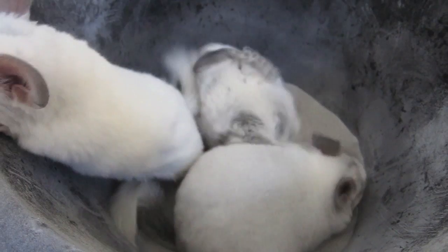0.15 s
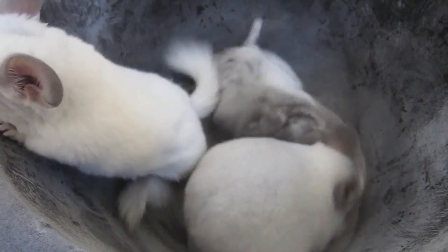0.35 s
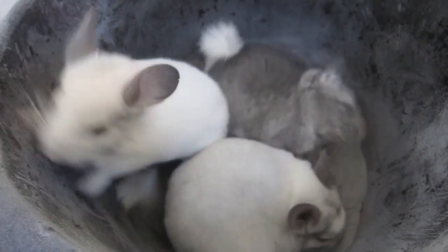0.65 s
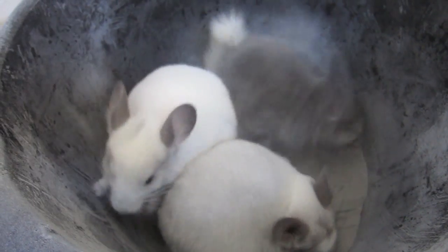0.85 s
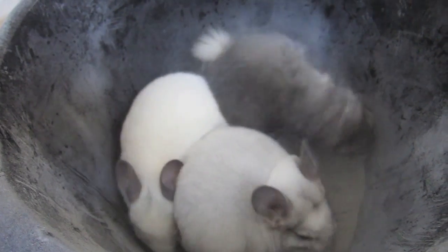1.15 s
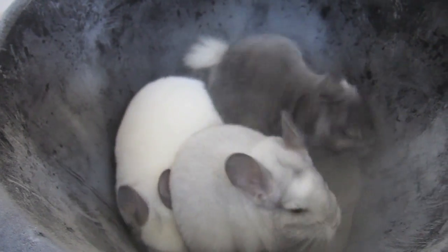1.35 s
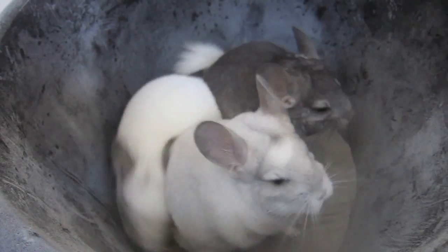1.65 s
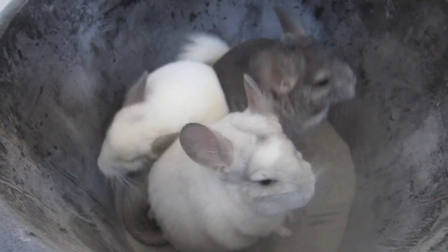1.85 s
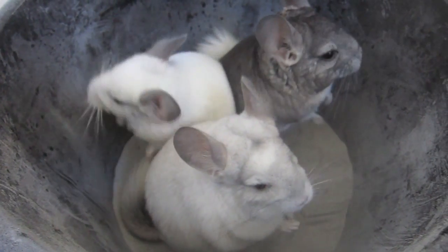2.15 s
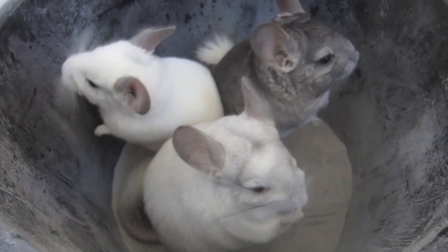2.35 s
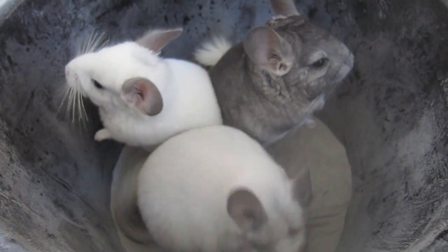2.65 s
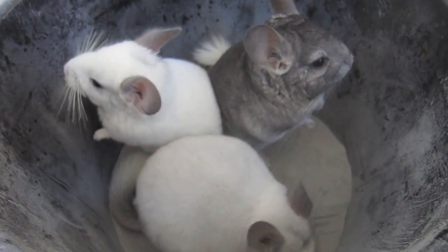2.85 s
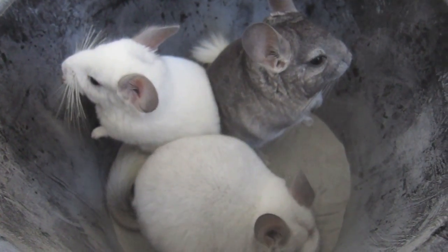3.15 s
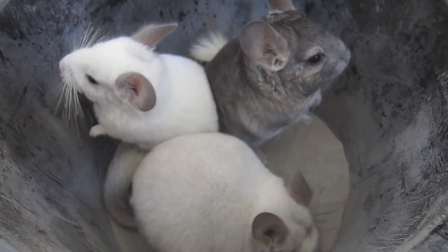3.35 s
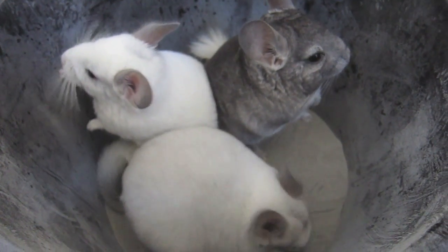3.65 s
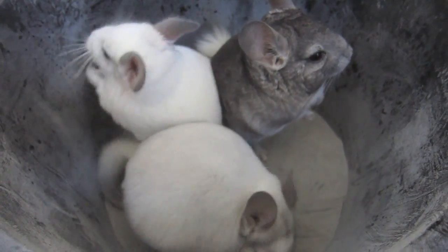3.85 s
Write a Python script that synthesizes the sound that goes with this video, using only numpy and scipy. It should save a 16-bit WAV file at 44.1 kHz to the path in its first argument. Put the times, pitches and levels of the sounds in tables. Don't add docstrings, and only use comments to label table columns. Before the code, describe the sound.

Small furry animals roll and scuffle in a bucket, with gritty scuffs, claw taps, and one hard knock.

```python
import sys
import numpy as np
from scipy import signal
from scipy.io import wavfile

SR = 44100
rng = np.random.default_rng(int(sys.argv[2]) if len(sys.argv) > 2 else 0)


def invert_db(x):
    u = np.asarray(x, float) / 20
    return 10 ** u


def wav_record(signal):
    frames = np.transpose(np.atleast_2d(signal))
    bounded = np.clip(frames, -1, 1)
    quanta = np.round(bounded * 32767).astype(np.int16)
    wavfile.write(sys.argv[1], SR, quanta)


N = 176400
TIME = np.arange(N) / SR
OPPOSITE = np.array([[1], [-1]])


def rms_one(x):
    return x / np.sqrt(np.mean(x ** 2) + 1e-20)


def at_hz(points, hz):
    table_hz, values = np.transpose(points)
    return np.interp(np.log(hz), np.log(table_hz), values)


def drift(rate_hz):
    step = 20
    r = np.exp(-2 * np.pi * rate_hz * step / SR)
    noise = rng.standard_normal(N // step + 2002)
    slow = signal.lfilter([1], [1, -2 * r, r * r], noise)[2000:]
    return np.interp(np.arange(N) / step, np.arange(len(slow)), rms_one(slow))


def ring(x, hz, t60):
    r = invert_db(-60 / (t60 * SR))
    w = 2 * np.pi * hz / SR
    return signal.lfilter([0, np.sin(w)], [1, -2 * r * np.cos(w), r * r], x + 1e-18)


def struck(s, db, hz, cycles):
    age = np.arange(4410) / SR
    out = np.zeros(N + len(age))
    for start, level_db, pitch in zip(s, db, hz):
        at = int(start * SR)
        fade = invert_db(level_db - 60 * age * pitch / cycles)
        out[at:at + len(age)] += fade * np.sin(2 * np.pi * pitch * age)
    return out[:N]


def bands(source, spectrum, low_hz, high_hz, patchy_db, alike_share):
    # (pitch [Hz], likeness [-1 to 1])
    likeness = [(30, 0.93), (150, 0.79), (1200, 0.83), (2500, 0.2), (5000, 0.69), (9000, -0.16),
                (15000, 0.85)]
    edges = np.geomspace(low_hz, high_hz, int(2 * np.log2(high_hz / low_hz)) + 2)
    out = 0
    for k, (low, high) in enumerate(zip(edges, edges[1:])):
        band = signal.butter(2, [low, high], "band", fs=SR, output="sos")
        mid, side = signal.sosfilt(band, source[k % 2])
        hz = np.sqrt(low * high)
        alike = at_hz(likeness, hz) - (1 - alike_share) * min(hz / 600, 1)
        alike = np.clip(alike, -1, 1)
        level = invert_db(at_hz(spectrum, hz) + patchy_db * drift(8.4))
        out = out + level * (np.sqrt(1 + alike) * mid + np.sqrt(1 - alike) * side * OPPOSITE)
    return out


def room_air():
    # (pitch [Hz], level [dB per Hz])
    room_spectrum = [(12, -44), (20, -13.5), (116, 0), (182, -26.5), (216, -12.5), (434, -15), (642, -20.5),
                     (759, -23), (16000, -43.5)]
    noise = rng.standard_normal((2, 2, N))
    return invert_db(-47) * rms_one(bands(noise, room_spectrum, 19.4, 19040, patchy_db=0.6, alike_share=0.52))


def appliance_hum():
    # (pitch [Hz], width [Hz], level [dB])
    hums = [(75.5, 16, -55), (123.9, 29, -49), (214.5, 12, -60)]
    out = 0
    for hz, width_hz, db in hums:
        mid, side = ring(rng.standard_normal((2, N)), hz, 2.1 / width_hz)
        out = out + invert_db(db) * rms_one(mid + 0.29 * side * OPPOSITE)
    return out


def electronic_whine():
    # (pitch [Hz], level [dB])
    whines = [(8799, -78.5), (8823, -74.5)]
    out = 0
    for hz, db in whines:
        level = invert_db(db + 0.5 + 1.7 * drift(3))
        out = out + level * np.sin(2 * np.pi * hz * TIME + 0.97 * drift(5.4))
    return out


def ping():
    # (time [s], peak level [dB], pitch [Hz])
    pings = [
        (2.338, -36, 1485),
    ]
    (s, db, hz), = pings
    return invert_db(db) * ring(np.arange(N) == int(s * SR), hz, 0.037)


def taps():
    # (time [s], peak level [dB], pitch [Hz])
    claw_taps = [(0.0149, -31, 2270), (0.0672, -19, 3000), (0.0734, -19.5, 1350), (0.0947, -18.5, 1730),
                 (0.1446, -21.5, 1300), (0.2084, -21, 1710), (0.2184, -21, 1850), (0.2394, -16.5, 2330),
                 (0.3994, -23, 1850), (0.4104, -23, 1690), (0.5062, -16.5, 1170), (0.5062, -11, 1810),
                 (0.5786, -15.5, 1300), (0.599, -27, 1710), (0.6514, -16, 1830), (0.7704, -17, 1800),
                 (0.8054, -35, 2890), (0.8195, -21.5, 1830), (0.854, -11, 2890), (0.8834, -22.5, 1650),
                 (0.9383, -21, 2040), (0.9562, -23.5, 1340), (1.0161, -21, 1210), (1.0415, -13, 2030),
                 (1.0655, -16.5, 1420), (1.1209, -24, 1830), (1.1747, -24, 1990), (1.2062, -27, 1500),
                 (1.2371, -24, 1210), (1.2516, -20, 1930), (1.3154, -30, 1260), (1.3399, -24, 2610),
                 (1.9754, -28.5, 2120), (2.0532, -36.5, 1770), (2.2054, -29, 2150), (2.2244, -31, 2060),
                 (2.3366, -43, 1470), (2.7487, -51.5, 1170), (2.8424, -47, 1440), (3.4376, -35, 1880),
                 (3.4845, -20, 3000), (3.5064, -25, 2060), (3.5483, -26, 1750), (3.5907, -18.5, 2670),
                 (3.6174, -29, 1680), (3.6247, -21, 1900), (3.6331, -28, 1940), (3.707, -34, 1240),
                 (3.9404, -35, 1250)]
    s, db, hz = np.transpose(claw_taps)
    s = s + 0.000922
    luck = rng.uniform(0, 1, (len(s), 2))
    body = struck(s, db - 5, hz, cycles=15.7)
    snap = struck(s, db - 6.2 * luck[:, 0], hz * (2.0 + 0.32 * luck[:, 1]), cycles=2.3)
    return body - snap


def knock():
    # (pitch [Hz], level [dB], t60 [s])
    wall_modes = [(725, -2.5, 0.038), (196, -8, 0.14), (1500, 4.5, 0.013), (2040, 4.5, 0.007),
                  (3120, 8.5, 0.0024), (4560, -33, 0.005), (10400, -16.5, 0.0055)]
    knock_s, knock_db = .3781, -2.5
    tick_lead_s, tick_db, body_lag_s = 0.00115, -26, 0.00168
    out = 0
    for k, (hz, level_db, t60) in enumerate(wall_modes):
        clicks = np.zeros(N)
        start = knock_s + body_lag_s * (hz < 1000)
        clicks[int(start * SR)] = invert_db(knock_db)
        clicks[int((knock_s - tick_lead_s) * SR)] = invert_db(knock_db + tick_db)
        out = out + invert_db(level_db - 10.5) * ring(clicks, hz, t60) * (-1) ** k
    return out


def bucket(rub, rolling):
    # (time [s], peak level [dB], favoured pitch [Hz])
    thumps = [(0.071, -23.5, 730), (0.098, -16.5, 194), (0.101, -21, 324), (0.155, -27, 635),
              (0.295, -22, 677), (0.502, -26.5, 310), (0.545, -29.5, 600), (0.578, -20.5, 305),
              (0.649, -14.5, 290), (0.686, -25.5, 300), (0.723, -14.5, 256), (0.766, -25, 310),
              (0.827, -11.5, 359), (0.844, -13.5, 324), (0.936, -18.5, 330), (0.955, -17.5, 261),
              (1.018, -20, 302), (1.043, -12.5, 335), (1.059, -18.5, 310), (1.077, -20.5, 259),
              (1.119, -25.5, 297), (1.143, -18, 364), (1.196, -32, 150), (1.166, -28, 240),
              (1.251, -23, 295), (1.339, -19, 331), (1.359, -23.5, 258), (2.17, -37, 560),
              (2.211, -34.5, 290), (2.243, -26.5, 227), (2.266, -31.5, 222), (2.336, -31.5, 318),
              (3.938, -31, 290), (3.941, -31.5, 705)]
    # (time [s], peak level [dB], favoured pitch [Hz])
    flank = [
        (0.387, -6, 445),
        (0.392, -15, 378),
        (.403, -22, 710),
        (.414, -23, 300),
        (.424, -24, 410),
    ]
    # (pitch [Hz], level [dB], t60 [s])
    modes = [(78.4, -9, 0.14), (127, -7, 0.16), (167.4, -1, 0.041), (209.4, -3.5, 0.072), (258, -5, 0.11),
             (300, -2, 0.1), (350.7, -1, 0.069), (429, -8, 0.047), (591, 1.5, 0.041), (658, -4, 0.06),
             (744.6, -6.5, 0.078), (1470, -14.5, 0.0033)]
    favour_octaves, shove_db = 0.41, -9.5
    heave_db, damp_db = 6.5, -7
    s, db, pitch = np.transpose(thumps + flank)
    s, db = s + 0.0016, db - 6.5
    luck_db = rng.normal(0, 2, (len(s), len(modes)))
    pad = signal.butter(2, 935, fs=SR, output="sos")
    out = np.zeros(N)
    for k, (hz, level_db, t60) in enumerate(modes):
        off = np.log2(hz / pitch) / favour_octaves
        favour_db = np.maximum(-6 * off ** 2, shove_db)
        clicks = np.zeros(N)
        clicks[(s * SR).astype(int)] = (-1) ** (k // 2) * invert_db(db + luck_db[:, k] + favour_db)
        roll_db = rolling * (heave_db * (hz < 200) + damp_db * (hz > 500))
        rubbing = rub * invert_db(roll_db) / np.sqrt(t60 * SR / 28)
        out += invert_db(level_db) * ring(signal.sosfilt(pad, clicks) + rubbing, hz, t60)
    load = struck(s, db - 1.5, pitch, cycles=27.6)
    return out + signal.sosfilt(pad, load)


def scuff_shapes():
    # (time [s], peak level [dB], dull part [dB], airy part [dB],
    # length [s])
    scuffs = [(0.074, -19.5, -7, -29, 0.016), (0.103, -20.5, -10.5, -29, 0.02),
              (0.149, -19, -6, -32, 0.0077), (0.209, -20.5, -12, -30, 0.0087),
              (.221, -18, -15, -34, 0.0088), (0.241, -19, -14.5, -42, 0.024), (0.402, -30, 3.5, -28, 0.01),
              (0.508, -21, -5.5, -27.5, 0.027), (0.572, -23.5, -0.5, -41, 0.0048),
              (.652, -18.5, -4, -37, 0.0088), (0.762, -24.5, -8, -32, 0.011),
              (0.807, -27.5, -12.5, -18.5, 0.014), (0.854, -12, -8.5, -32.5, 0.0062),
              (1.018, -38, 8, -27, 0.0036), (1.042, -21, -3, -31, 0.0066), (1.066, -20, -3, -26, 0.0069),
              (1.13, -25.5, -10, -26, 0.027), (1.173, -26.5, -7, -35, 0.0068),
              (1.238, -19, -18, -37, 0.0062), (1.254, -27, -9.5, -25, 0.022),
              (1.345, -20, -12.5, -30, 0.0083)]
    # (time [s], peak level [dB], dull part [dB], airy part [dB], length [s])
    more_scuffs = [(1.211, -25.5, -12, -25, 0.0081), (1.29, -32, -10, -31, 0.0041),
                   (0.379, -17.5, -10, -25.5, 0.0094), (1.465, -36.5, -11, -22, 0.0044),
                   (1.797, -41, -6, -28, 0.014), (1.973, -35.5, -8, -30, 0.0099),
                   (1.992, -36, -7, -26, 0.0078), (2.169, -37, -9, -25, 0.023),
                   (2.209, -30, -8, -29, 0.007), (2.338, -26, -14, -41, 0.0034),
                   (2.751, -36, -17, -26, 0.0038), (2.846, -38.5, -20, -17.5, 0.0026),
                   (3.44, -25.5, -19, -35, 0.0077), (3.484, -25.5, -24, -38, 0.015),
                   (3.527, -29.5, -14, -27, 0.014), (3.551, -27.5, -25, -31, 0.016),
                   (3.593, -22, -6, -30, 0.0043), (3.621, -20.5, -32, -30, 0.015),
                   (3.633, -15.5, -21, -35, 0.0065), (3.711, -23.5, -10.5, -29, 0.0092),
                   (3.687, -28.5, -10, -25, 0.013), (3.725, -28, -8, -31, 0.0071),
                   (3.862, -29.5, -27, -17, 0.0059), (3.944, -23.5, -9, -31, 0.009)]
    power = np.zeros((4, N))
    for s, db, dull_db, air_db, length in scuffs + more_scuffs:
        at = slice(int((s - .03) * SR), int((s + .08) * SR))
        age = (TIME[at] - s) / max(length, .001)
        fall = np.where(age < 0, (age / 0.39) ** 2, np.abs(age) ** 1.08)
        bright_db = -2.5 + 0.49 * (air_db + 27)
        part_db = np.array([[dull_db + 11.0], [0], [bright_db], [air_db + 16.0]])
        power[:, at] += (invert_db(db - 11.5 + part_db) * np.exp(-fall)) ** 2
    return power


def grit():
    # (pitch [Hz], level [dB per Hz])
    dust_spectrum = [(290, -33), (500, -3), (634, -5), (1140, -3), (1300, -6), (3000, -5), (7400, -14),
                     (9620, -46), (16300, -120)]
    air_spectrum = [(10000, 0), (15000, -11.5)]
    grains_per_s = 1800 * invert_db(5.0 * drift(60))
    born = rng.random(N) < grains_per_s / SR
    sizes = invert_db(3 * np.minimum(rng.exponential(1, N), 6))
    source = rng.standard_normal((2, 2, N)) * (0.57 + born * sizes)
    dull = bands(source, dust_spectrum, 441, 1951, patchy_db=0.5, alike_share=1)
    crisp = bands(source, dust_spectrum, 1680, 4830, patchy_db=1.5, alike_share=0.89)
    bright = bands(source, dust_spectrum, 4480, 7030, patchy_db=2.0, alike_share=0.65)
    air = bands(source, air_spectrum, 7600, 19000, patchy_db=1.0, alike_share=1)
    body_rms = np.sqrt(np.mean((dull + crisp + bright) ** 2))
    return dull / body_rms, crisp / body_rms, bright / body_rms, rms_one(air)


def dust(churn_db, scuffs):
    part_lean_db = [-.5, -.3, .3, .6]
    hiss = invert_db(churn_db + 3 + 2.0 * drift(18.4))
    part_db = np.array([[0], [0], [0], [-10]])
    power = scuffs + (hiss * invert_db(part_db)) ** 2
    out = 0
    for part, part_power, lean_db in zip(grit(), power, part_lean_db):
        out = out + part * np.sqrt(part_power) * invert_db(lean_db * OPPOSITE)
    return out


def scene():
    # (time [s], level [dB])
    churn = [(0, -42.5), (.27, -46), (.33, -45), (.42, -43.5), (.62, -44), (1.33, -45.5), (1.42, -55),
             (1.7, -62.5), (2.15, -60.5), (2.21, -48.5), (2.25, -61), (3.42, -66), (3.481, -46),
             (3.73, -49.5), (3.799, -51), (4, -55.5)]
    churn_db = np.interp(TIME, *np.transpose(churn))
    scuffs = scuff_shapes()
    rolling = np.clip(np.minimum(TIME - 0.615, 1.5 - TIME) * 20, 0, 1)
    rub_db = 0.5 - 54.0 + 5.5 * rolling + 1.08 * (churn_db + 44.0) + 4.14 * drift(8.5)
    rub = invert_db(rub_db) + invert_db(-20) * np.sqrt(scuffs[0])
    wall = bucket(rub * rng.standard_normal(N), rolling) + knock() + taps() + ping()
    wall = signal.sosfilt(signal.butter(2, 55, "high", fs=SR, output="sos"), wall)
    echo = 0.082 * np.roll(wall, 90)
    room = room_air() + appliance_hum() + electronic_whine()
    mix = np.stack([wall + echo, wall - echo]) + dust(churn_db, scuffs) + room
    return mix * invert_db(-.3 * OPPOSITE)


def band_limit(x):
    return signal.sosfilt(signal.butter(12, 15850, fs=SR, output="sos"), x)


def record(dry):
    notch_hz, width_hz = 8183, 1180
    edges = [notch_hz - width_hz / 2, notch_hz + width_hz / 2]
    x = signal.sosfilt(signal.butter(2, edges, "bandstop", fs=SR, output="sos"), dry)
    x = signal.sosfilt(signal.ellip(10, .5, 60, 15600, fs=SR, output="sos"), x)
    return band_limit(x)


dry = scene()
out = record(dry)
wav_record(out)
```